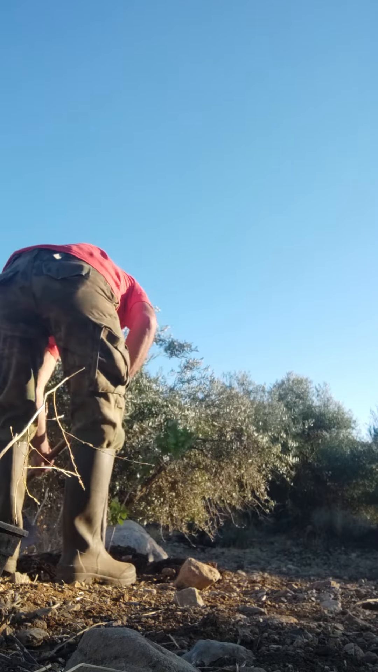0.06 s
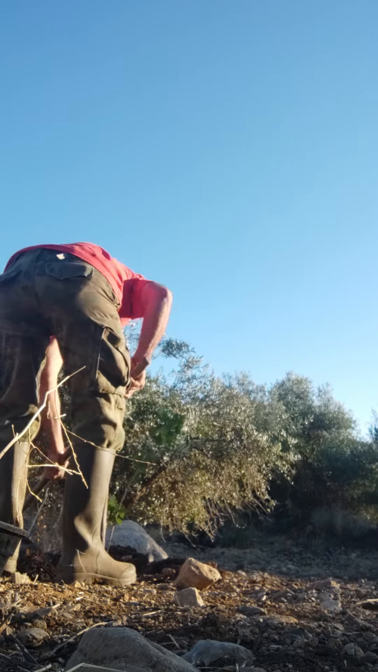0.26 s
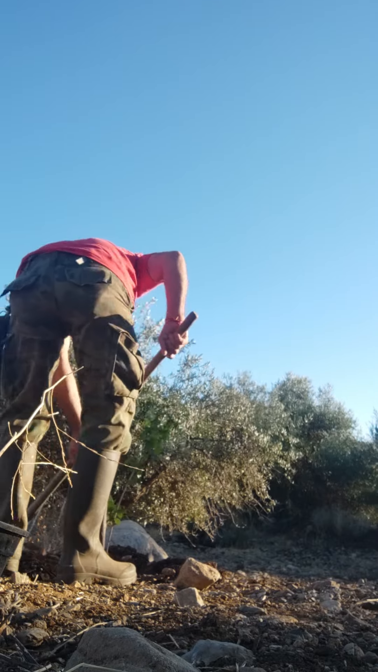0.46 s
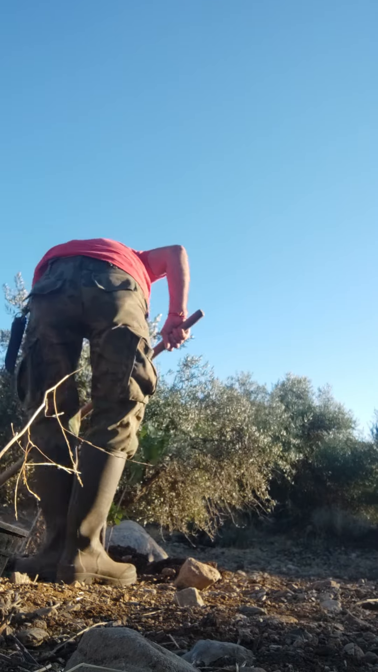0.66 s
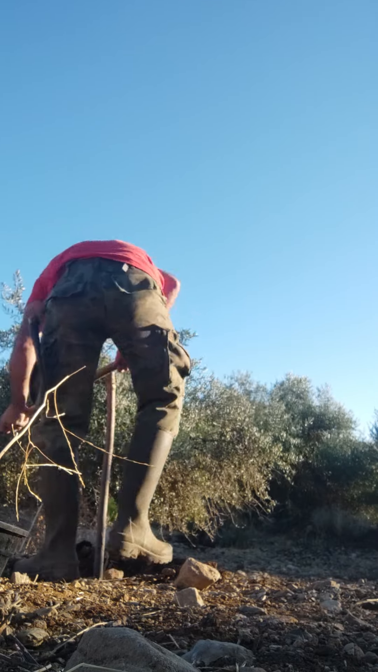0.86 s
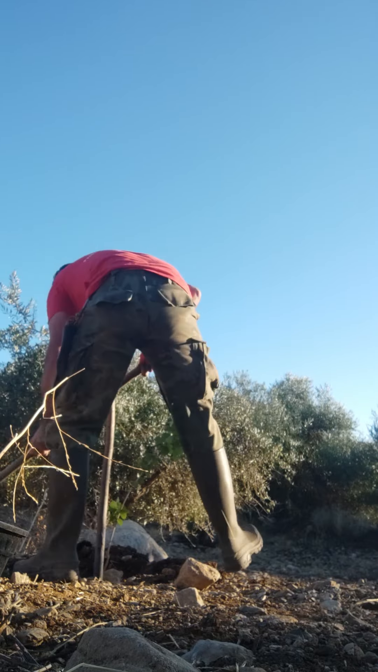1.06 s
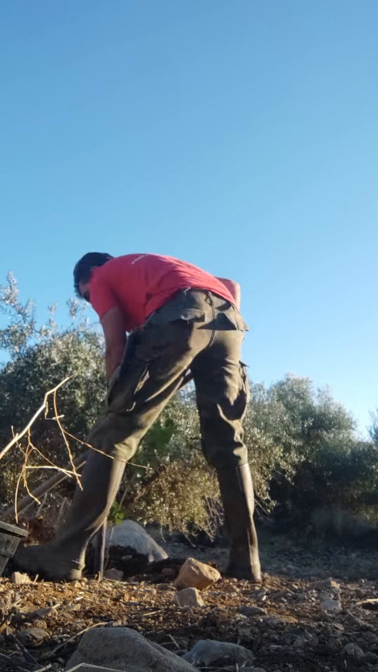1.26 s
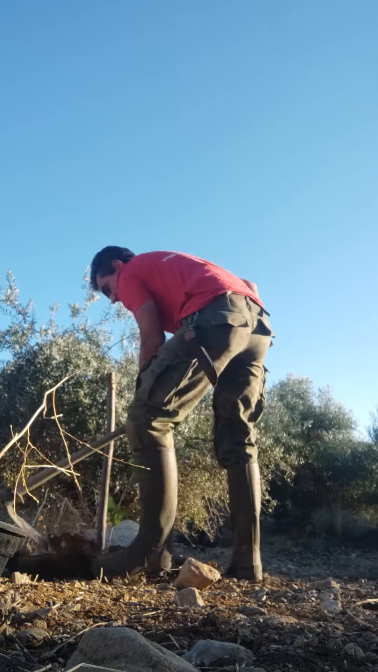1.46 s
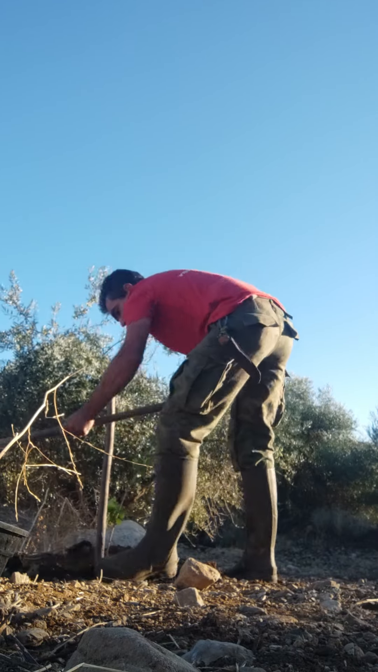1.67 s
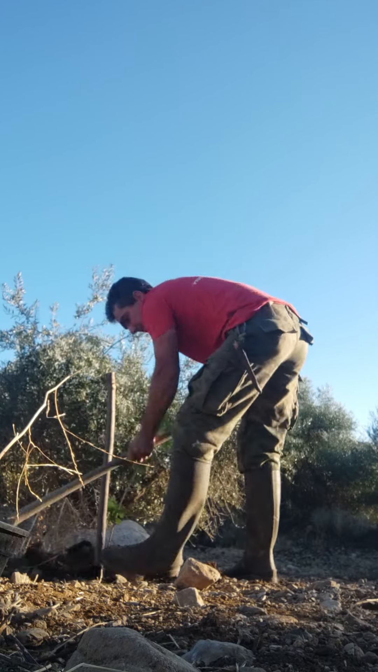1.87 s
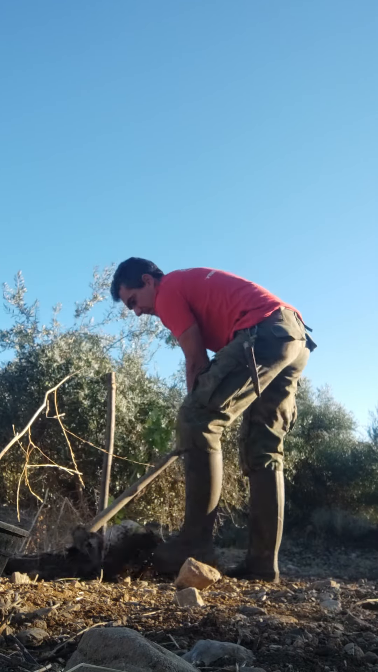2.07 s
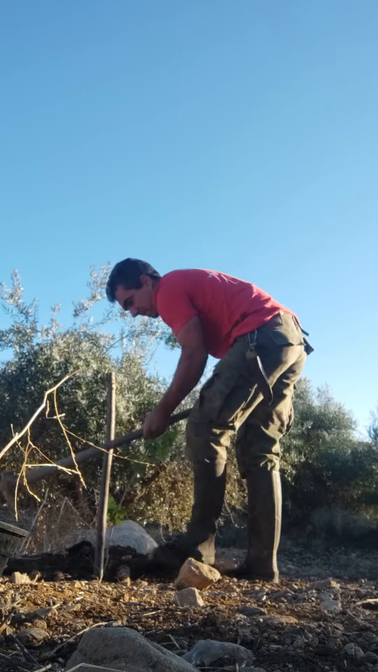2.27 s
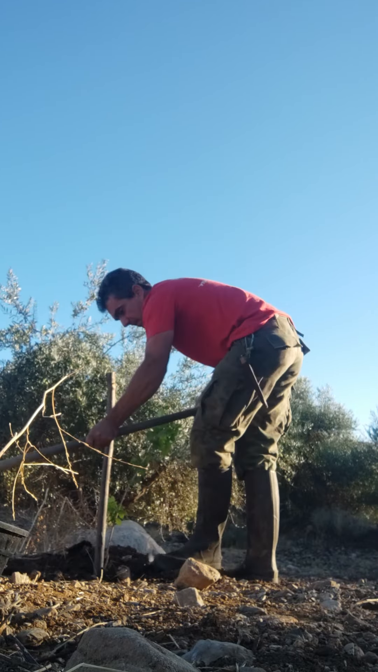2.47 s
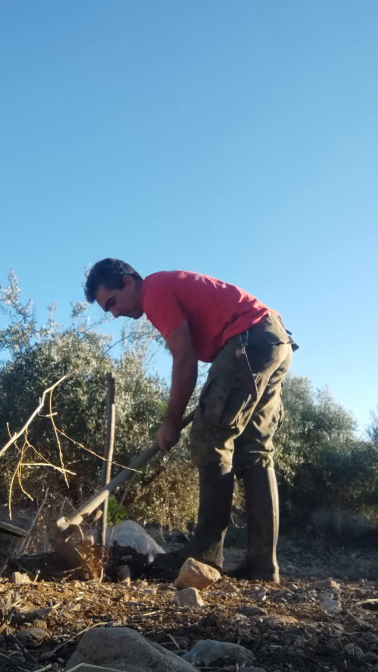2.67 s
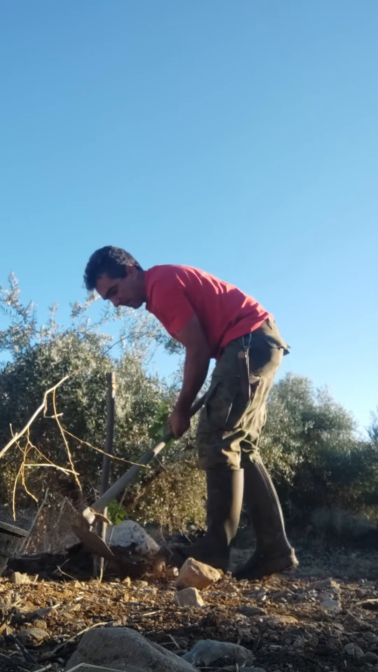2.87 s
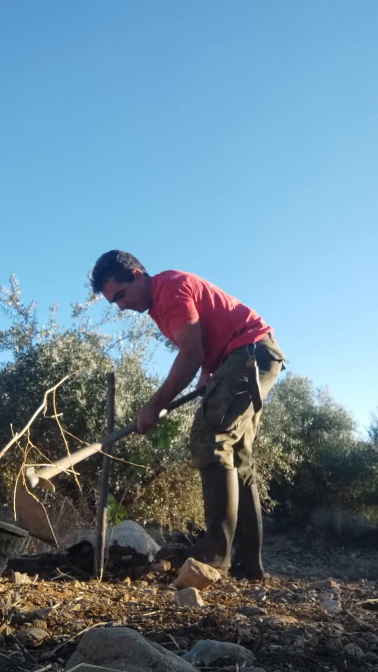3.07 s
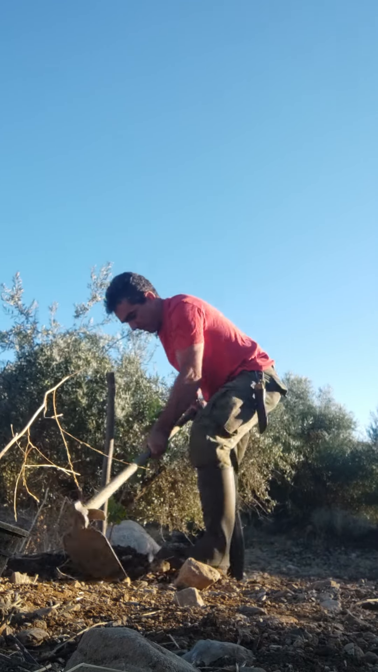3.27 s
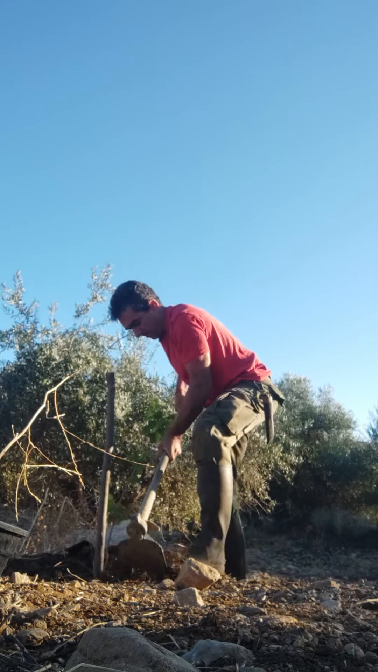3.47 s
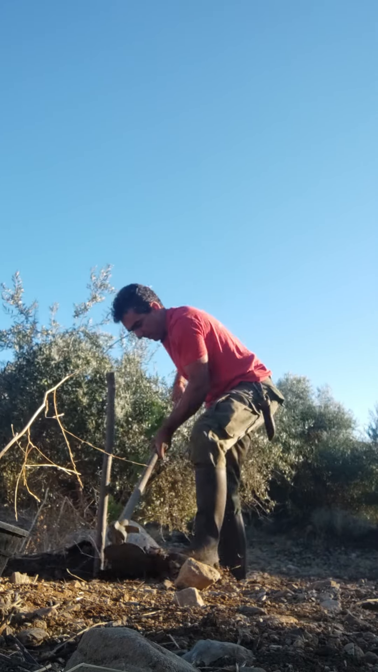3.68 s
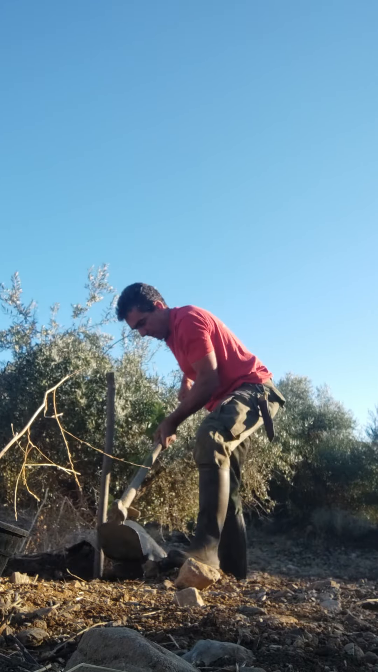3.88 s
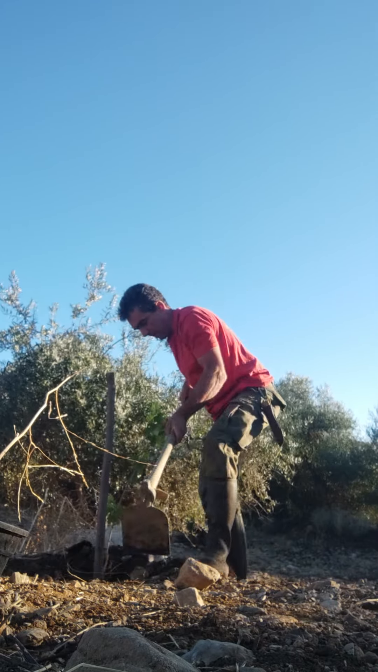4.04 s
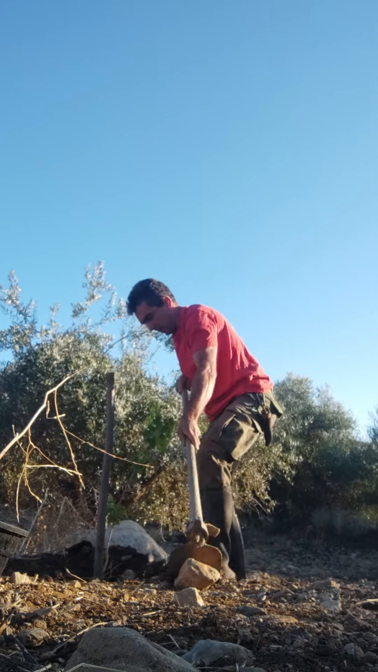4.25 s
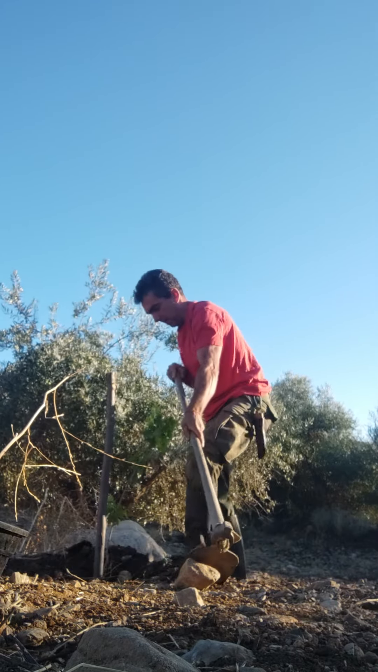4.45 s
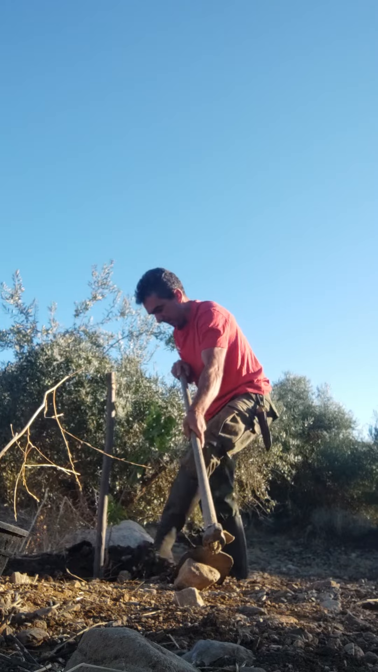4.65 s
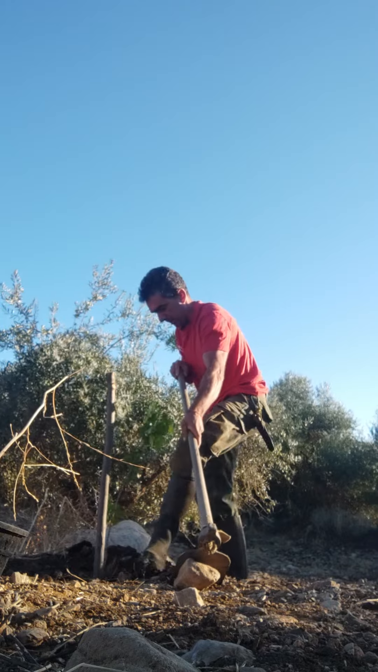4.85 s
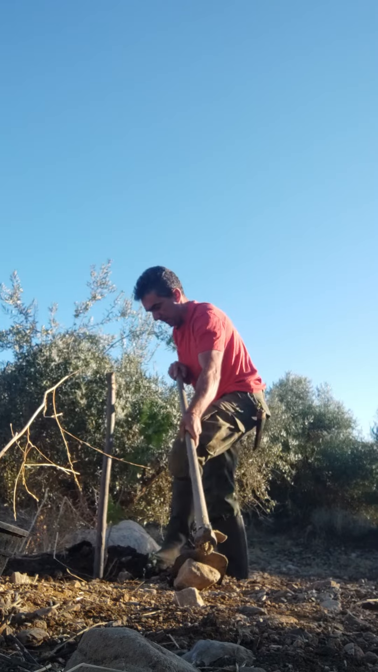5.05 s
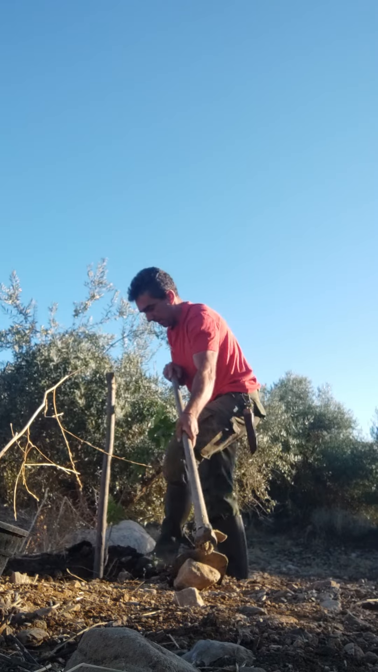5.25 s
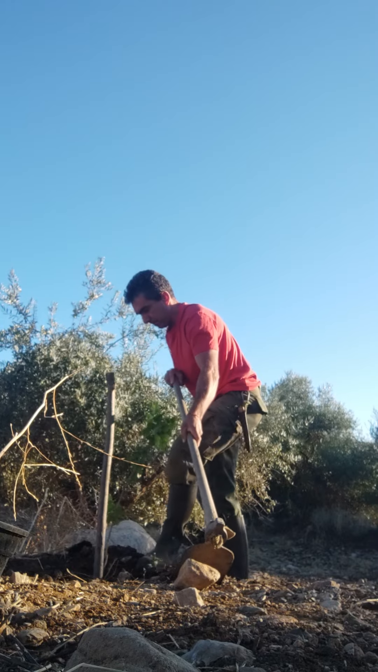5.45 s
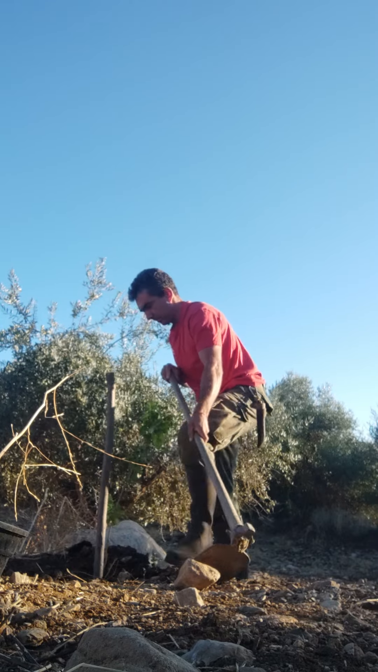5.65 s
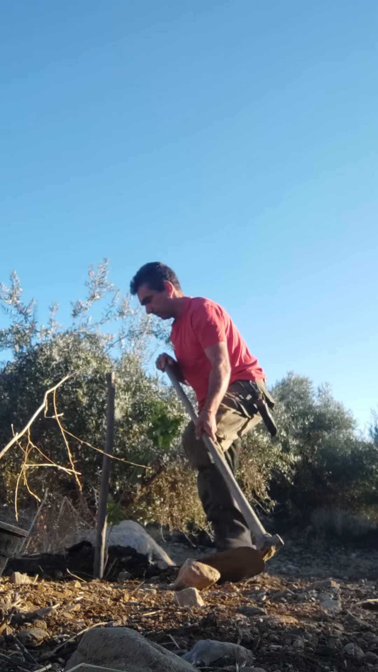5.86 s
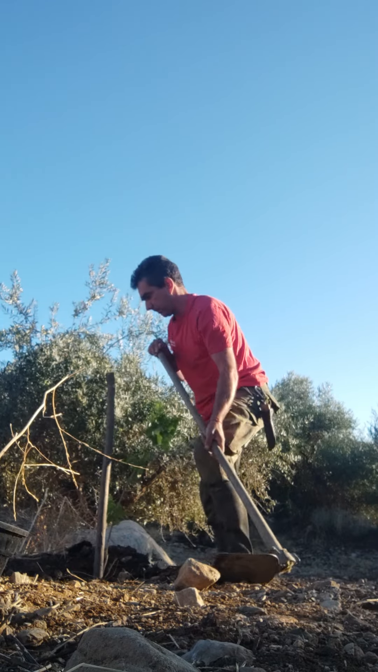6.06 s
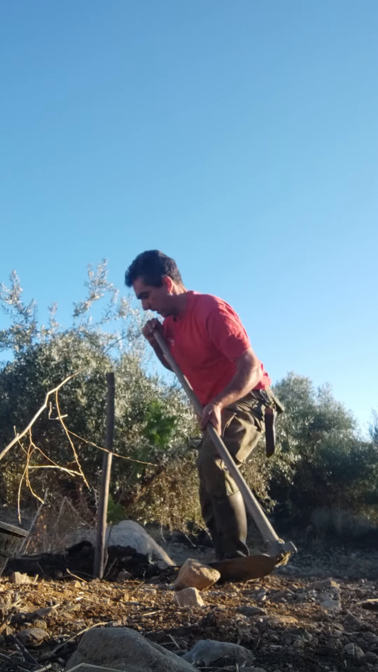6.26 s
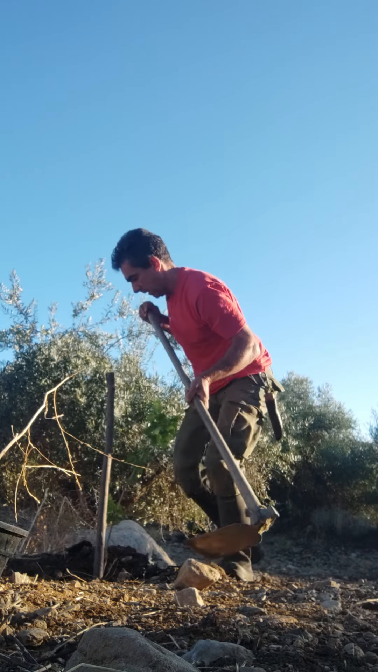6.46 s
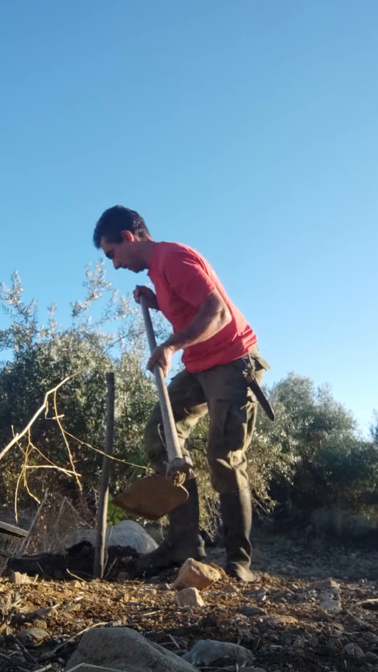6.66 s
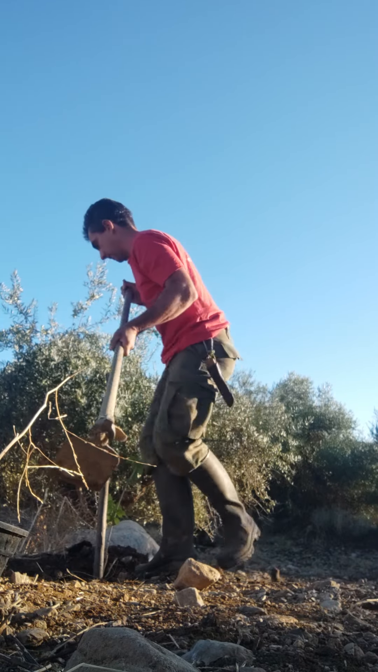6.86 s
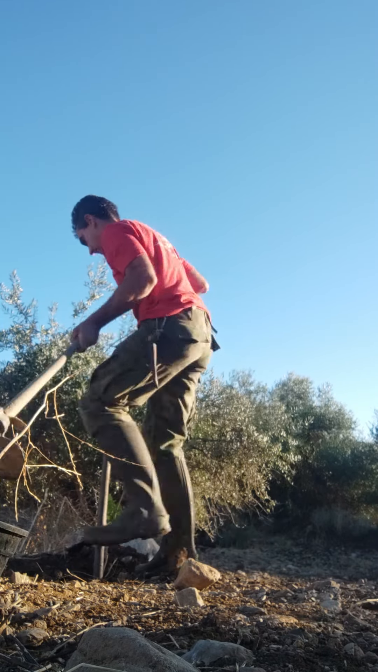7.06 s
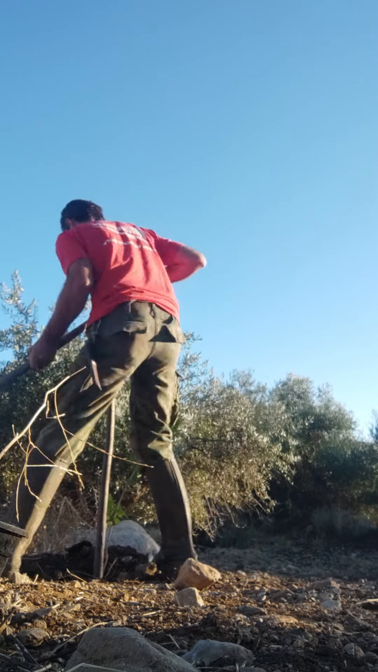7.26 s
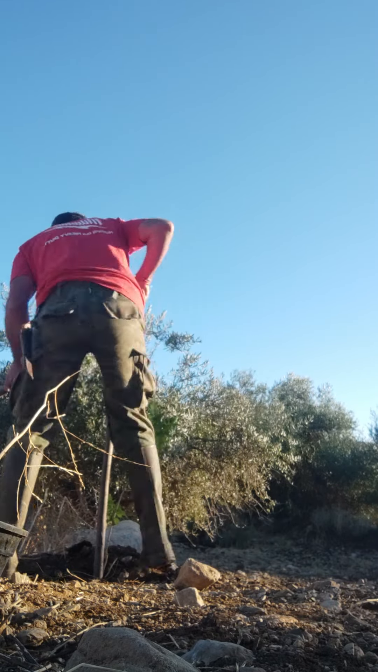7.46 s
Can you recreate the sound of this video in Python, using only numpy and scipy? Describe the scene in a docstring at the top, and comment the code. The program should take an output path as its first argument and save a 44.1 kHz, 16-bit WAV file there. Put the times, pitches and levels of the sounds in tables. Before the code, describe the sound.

Close to the ground in a quiet orchard, a hoe works dry stony soil. A small gritty scrape comes first, then a hard crunch just after one second, more chops and earth sliding, a cluster of blade clinks and gravel near three and a half seconds, then sparse dull knocks and low wind puffs. The microphone lies on the soil; left is bright and open, right muffled.

```python
"""Low rumble and a fading puff of wind, then gritty crunches close by: a broad steel hoe chops and drags
through dry stony orchard ground, a few steps from a phone lying on the soil. Each contact is noise-like grit
with a ringing stone, clod and blade; filtered clicks make the loose earth slide. Decaying sines thump through
the ground and low noise puffs on the open left port; the covered right port hears the digging dulled.
Behind it all lies a faint murmur of wind in leaves and microphone hiss, made of noise bands."""
import sys
import numpy as np
from scipy import signal
from scipy.fft import rfft, irfft
from scipy.io import wavfile

SR = 44100
rng = np.random.default_rng(int(sys.argv[2]) if len(sys.argv) > 2 else 0)


def log_audio(samples):
    """Write samples as a 16-bit WAV file to the path given in sys.argv[1]."""
    # one column per channel
    frames = np.atleast_2d(samples).T
    # limit to full scale, then quantise
    limited = np.clip(frames, -1, 1)
    pcm = np.round(limited * 32767).astype(np.int16)
    wavfile.write(sys.argv[1], SR, pcm)


N = 331632

# spectrum of crushed grit: (f/Hz, relative density level/dB)
CRUNCH_SPECTRUM = [(88, -32), (150, 2), (453, 3), (901, -3.5), (1090, -14.5), (1930, -7), (2830, -4),
                   (3110, -4), (3690, -4), (5950, -7.5), (7340, -10), (7920, -4), (8880, -20),
                   (11600, -11.5), (14300, -12.5)]
# modes of the steel blade: (f/Hz, relative level/dB, t60/s when hanging free)
BLADE_MODES = [(1845, -11, .4), (2335, -3, .3), (2786, -13, .15), (3290, -15, .15), (3736, -8, .2),
               (4097, -12, .2), (4253, -9, .2), (4705, -3, .2), (4850, -13, .15), (5460, -10, .12),
               (5636, -7, .1), (5904, -10, .1), (6212, -6, .12), (6428, -6, .13), (6900, -8, .1),
               (7542, -9, .15), (8060, -4, .2), (10650, -17, .15), (11510, -14, .15)]


def from_db(db):
    """Decibels to gain."""
    return 10 ** (np.asarray(db) / 20)


def rms_one(x):
    """Scale to unit rms."""
    return x / np.sqrt(np.mean(x ** 2) + 1e-20)


def in_time(rows):
    """Columns of a curve table, one value per sample."""
    s, *columns = np.transpose(rows)
    return [np.interp(np.arange(N) / SR, s, column) for column in columns]


def at_hz(points, hz):
    """Read a spectrum on a log-frequency axis."""
    point_hz, values = np.transpose(points)
    return np.interp(np.log(hz), np.log(point_hz), values)


def colour(x, points, sign=1):
    """Causal (minimum-phase) filter with the given dB spectrum; sign -1 inverts it."""
    size = 4096
    hz = np.maximum(np.arange(size // 2 + 1) * SR / size, 1)
    log_gain = sign * at_hz(points, hz) * np.log(10) / 20
    # folding the cepstrum onto positive times gives minimum phase
    cepstrum = irfft(log_gain)
    cepstrum[1:size // 2] *= 2
    cepstrum[size // 2 + 1:] = 0
    impulse_response = irfft(np.exp(rfft(cepstrum)))
    return signal.fftconvolve(x, impulse_response)[:N]


def band(x, low_hz, high_hz):
    """Butterworth band-pass."""
    edges_hz = [low_hz, min(high_hz, .45 * SR)]
    return signal.sosfilt(signal.butter(2, edges_hz, "band", fs=SR, output="sos"), x)


def drift(rate_hz):
    """Slow chance with unit spread: noise through two equal one-pole low-passes."""
    r = np.exp(-2 * np.pi * rate_hz / SR)
    noise = rng.standard_normal(N + SR)
    return rms_one(signal.lfilter([1], [1, -2 * r, r * r], noise)[SR:])


def grains(per_s, spread_db):
    """Random clicks of uneven size (equal if the spread is 0), either sign; rms 1."""
    sizes = from_db(spread_db * np.minimum(rng.exponential(1, N), 4)) * rng.choice([-1, 1], N)
    return rms_one(sizes * (rng.random(N) < per_s / SR))


def ring(force, hz, t60):
    """Two-pole resonance: a unit click sets a decaying sine of starting height 1 ringing."""
    r, w = from_db(-60 / (t60 * SR)), 2 * np.pi * hz / SR
    return signal.lfilter([0, np.sin(w)], [1, -2 * r * np.cos(w), r * r], force + 1e-18)


def swells(rows):
    """Each row climbs to its peak and falls away straight in dB; the loudest rules. One gain per level column."""
    t, out = np.arange(0, N, 16) / SR, -200
    for s, rise, fall, *level_db in rows:
        below = np.where(t < s, (s - t) / rise, (t - s) / fall)
        out = np.maximum(out, np.array(level_db)[:, None] - 30 * below)
    return np.array([from_db(np.interp(np.arange(N) / SR, t, v)) for v in out])


def two_ports(mid, side, alike):
    """Two equally strong noises become left and right with the given correlation."""
    return np.sqrt(1 + alike) * mid + np.sqrt(1 - alike) * side * [[1], [-1]]


def air():
    """Distant murmur of wind in leaves and microphone hiss: half-octave noise bands of wandering level."""
    # spectrum of the murmur: (f/Hz, relative density level/dB)
    spectrum = [(15, -33.5), (25, -10.5), (87, -2.5), (179, -1.5), (503, -8.5), (770, -16.5), (1380, -19),
                (3060, -24.5), (4440, -30), (4940, -26), (7170, -43), (7970, -39), (8860, -42.5),
                (13200, -28), (14300, -27.5)]
    # (f/Hz, left minus right level/dB)
    balance = [(60, -5), (110, -7), (200, 4), (370, -4), (690, 4.5), (1270, 2), (2330, 6.5), (4290, 5),
               (7900, 1.5), (14500, 11)]
    # (f/Hz, left-right correlation [-1 to 1])
    likeness = [(60, 0.56), (130, 1), (290, 0.6), (630, 0.28), (1380, -0.02), (3030, -0.057),
                (6630, -0.095), (14500, 0.75)]
    # unsteadiness: (f/Hz, spread of level/dB)
    unsteadiness = [(100, 3), (700, 3), (3000, 1.5), (9000, .7)]
    murmur_db = -59.5
    out, edges = 0, 22 * 2 ** np.arange(0, 9.6, .5)
    white = rng.standard_normal((2, 2, N))
    flicker = [drift(10), drift(8), drift(4.7)]   # dealt to the bands in turn
    for k, (low, high) in enumerate(zip(edges, edges[1:])):
        mid, side = band(white[k % 2], low, high)
        hz = np.sqrt(low * high)
        lean = at_hz(balance, hz) / 2
        gain = from_db(at_hz(unsteadiness, hz) * flicker[k % 3] + [[lean], [-lean]])
        out = out + gain * two_ports(mid, side, at_hz(likeness, hz))
    return from_db(murmur_db) * rms_one(np.array([colour(port, spectrum) for port in out]))


def ground_rumble():
    """Ground rumble under the blows and steps: swelling low noise, nearly alike at both ports."""
    # (peak t/s, rise/s, fall/s, relative level/dB); rise and fall span 30 dB
    rumbles = [(0, .1, 0.3, -42.5), (.4, .4, 0.56, -46), (.67, 0.057, 0.13, -41.5), (.9, 0.24, 0.42, -48),
               (1.13, 0.11, .12, -38.5), (1.45, 0.54, 0.32, -36), (1.7, 0.99, .3, -45.5),
               (1.9, .2, 0.22, -40.5), (2.08, 0.27, .25, -42), (2.32, 0.12, 0.16, -43),
               (2.47, 0.025, 0.13, -44.5), (2.57, 0.04, 0.2, -33.5), (2.7, .2, .08, -39.5),
               (2.81, 0.2, 0.048, -39.5), (2.89, 0.095, 0.15, -43.5), (3.2, 0.19, 0.2, -41.5),
               (3.52, .2, .25, -40.5), (4.25, 0.12, 0.76, -46.5), (4.71, .15, 0.35, -47.5),
               (5.12, 0.53, 0.13, -51), (5.28, 0.036, 0.16, -42.5), (5.61, 0.34, 0.29, -48.5),
               (5.97, 0.045, .17, -47), (6.7, 0.019, 0.033, -31.5), (6.85, .3, .07, -42),
               (7.06, .15, 0.1, -49), (7.33, .4, .6, -48)]
    calm_db, trim_db, alike = -59, -9.5, .98
    level = swells(rumbles)[0] + from_db(calm_db)
    mid, side = band(rng.standard_normal((2, N)), 66, 190) * from_db(.78 * drift(3.3))
    return level * from_db(trim_db) * rms_one(two_ports(mid, side, alike))


def wind_puffs():
    """Wind buffets the open port: very low noise of restless level."""
    # (peak t/s, rise/s, fall/s, relative level/dB); rise and fall span 30 dB
    gusts = [(0, .1, 0.082, -44), (.12, .07, 0.11, -55), (.67, 0.4, 0.23, -46), (2.7, 0.11, 0.062, -48),
             (3.52, 0.063, .15, -55), (3.98, 0.27, .25, -55.5), (5.82, 0.064, 0.047, -39.5),
             (6.12, 0.063, .12, -38), (6.38, .1, 0.19, -53.5), (6.55, 0.067, .12, -49.5),
             (6.71, .08, 0.23, -45), (6.81, .15, 0.048, -31.5), (7.18, 0.11, 0.11, -44.5)]
    calm_db, trim_db = -67, 3
    level = swells(gusts)[0] + from_db(calm_db)
    buffeting = band(rng.standard_normal(N), 22, 85) * from_db(4 * drift(12))
    return level * from_db(trim_db) * rms_one(buffeting)


def thumps():
    """Thumps through the ground and gust slaps: decaying sines, each leaning to one port."""
    # (t/s, level/dB before the lean, f/Hz, t60/s, left minus right level/dB)
    pushes = [(0.352, -38, 116, 0.14, 0), (0.558, -30.5, 86, 0.069, 32), (0.967, -50, 180, 0.2, 2),
              (1.119, -35.5, 93, 0.26, -3), (1.207, -34, 117, 0.22, -5.5), (1.278, -47, 119, 0.48, -25),
              (1.835, -31.5, 110, 0.2, -5), (2.045, -41, 125, 0.4, -8), (2.569, -39, 96.9, 0.16, -4.0),
              (2.677, -38, 90.5, 0.11, -8), (2.774, -50, 183, 0.059, -7), (3.337, -41.5, 147, 0.17, -3),
              (3.482, -40, 183, 0.064, 1.0), (4.679, -41, 184.6, 0.14, -2), (4.879, -39.5, 80, 0.038, -1),
              (5.266, -37, 206, 0.073, -2), (5.797, -32.5, 58.7, 0.13, 17.5), (5.955, -55, 159, 0.18, -0.5),
              (6.095, -29.5, 67.5, 0.085, 28), (6.523, -43.5, 96, 0.14, 6),
              (6.681, -30.5, 104.4, 0.14, 30.5), (7.164, -49.5, 48.4, 0.08, 14)]
    out = np.zeros((2, N))
    for s, peak_db, hz, t60, pan_db in pushes:
        start = int(s * SR)
        t = np.arange(min(SR // 4, N - start)) / SR
        onset = np.minimum(t * hz * 2, 1)   # half a cycle
        push = from_db(peak_db - 60 * t / t60) * np.sin(2 * np.pi * hz * t) * onset
        lean = np.tanh(pan_db * np.log(10) / 40)
        out[:, start:start + len(t)] += push * [[1 + lean], [1 - lean]]
    return out


def soil():
    """Crumbs knock softly while earth slides; fine grit patters in clumps: coloured clicks."""
    # loose soil on the move: (t/s, sliding earth level/dB, fine grit relative level/dB)
    motion = [(0, -64, -67.5), (.3, -61.5, -64.5), (.95, -72.5, -73), (1.15, -58.5, -67),
              (1.35, -54.5, -62), (1.75, -63, -66.5), (2.02, -52.5, -62), (2.36, -62, -70),
              (2.74, -73, -67), (2.9, -62.5, -65), (3.3, -65.5, -71.5), (3.52, -51.5, -51.5),
              (3.8, -59, -56), (4.05, -56, -67), (4.55, -61, -68), (5.4, -68, -71.5), (6.2, -60.5, -70),
              (6.9, -66.5, -73.5), (7.52, -68, -71)]
    # spectrum of sliding earth: (f/Hz, relative density level/dB)
    earth_spectrum = [(120, -24.5), (250, 0), (450, 3), (800, -8.5), (1300, -9.5), (2500, -28),
                      (15000, -50.5)]
    earth_db, grit_db = in_time(motion)
    earth = colour(grains(1500, spread_db=2), earth_spectrum) * from_db(3.5 * drift(25))
    grit = band(colour(grains(7000, spread_db=3), CRUNCH_SPECTRUM), 1600, 16000) * from_db(2.5 * drift(40))
    return from_db(earth_db) * rms_one(earth) + from_db(grit_db - 2.5) * rms_one(grit)


def free_blade():
    """Knocks on the lifted blade set all modes ringing, with strengths that vary at random as if by place."""
    # (t/s, relative level/dB, tilt/dB per octave about 4 kHz)
    knocks = [(.18, -68, 5), (2.691, -47, 7), (2.792, -54, 6.5), (2.83, -66, -4), (2.859, -55.5, -3),
              (2.885, -72, 18), (3.41, -39.5, 2), (3.63, -61, -2), (3.699, -58, 4), (3.732, -59, 2),
              (3.8, -43, 2.5), (3.82, -41, 3), (3.875, -51.5, -12), (5.512, -57, -6)]
    s, knock_db, tilt_db = np.transpose(knocks)
    at, out = np.round(s * SR).astype(int), np.zeros(N)
    where_db = rng.normal(0, 2.5, (len(at), len(BLADE_MODES)))
    for k, (hz, level_db, t60) in enumerate(BLADE_MODES):
        clicks = np.zeros(N)
        clicks[at] = from_db(knock_db + level_db + tilt_db * np.log2(hz / 4000) + where_db[:, k])
        out += ring(clicks, hz, t60)
    return out


def buried_blade(jolt):
    """The blade's modes driven by the digging, all damped short by soil; each mode's strength wanders."""
    t60_s, ring_db = .045, -25.5
    tilt_db = 1.5   # per octave: soil stills the low modes most
    out = np.zeros(N)
    for hz, level_db, _ in BLADE_MODES:
        mode_db = ring_db + level_db + tilt_db * np.log2(hz / 4000) + 4 * drift(25)
        out += ring(jolt * from_db(mode_db), hz, t60_s)
    return out


def drags():
    """Clicks dealt to short resonances of clods and gravel, over finer sand; also returns the blade's jolts."""
    # bursts of scraping: (peak t/s, rise/s, fall/s, then relative level/dB of gravel, sand, crumbling clods);
    # rise and fall span 30 dB
    scrapes = [(.29, 0.013, 0.041, -42.5, -40.5, -39), (.364, 0.14, 0.096, -42.5, -64, -37.5),
               (.7, 0.17, 0.49, -67, -83, -48.5), (1.102, 0.0044, 0.062, -27, -24, -48),
               (1.128, 0.025, 0.097, -35.5, -32.5, -40), (1.19, 0.09, .05, -38.5, -60, -35.5),
               (1.38, .05, .2, -65, -61, -45), (1.476, .12, 0.11, -58, -55, -37),
               (1.834, 0.0074, 0.033, -30.5, -17.5, -27.5), (1.9, 0.042, 0.074, -35.5, -31, -45),
               (2.032, 0.062, 0.14, -57, -57, -47), (2.566, 0.0071, 0.12, -27.5, -21, -35.5),
               (2.68, 0.032, .08, -33.5, -34, -43), (2.786, 0.026, 0.047, -38, -40.5, -35),
               (2.82, 0.018, 0.24, -56, -54, -49.5), (3.349, 0.0095, 0.049, -26.5, -24, -32),
               (3.37, .03, 0.048, -50, -45, -28), (3.39, 0.04, 0.23, -39.5, -38, -40),
               (3.485, 0.034, 0.062, -43, -26.5, -36), (3.524, 0.026, 0.028, -29, -45, -36),
               (3.56, .02, 0.17, -50.5, -45.5, -49.5), (3.808, 0.031, 0.048, -43.5, -37, -40),
               (3.87, 0.042, 0.12, -74, -58, -59), (4.269, .003, 0.075, -44, -27.5, -35),
               (4.407, 0.053, 0.057, -58.5, -69, -60), (4.505, 0.013, 0.16, -58, -70.5, -51),
               (4.91, .1, 0.14, -61, -83, -54.5), (5.52, .1, 0.15, -53, -61, -60),
               (6.04, 0.019, .12, -55.5, -63, -46), (6.068, 0.066, 0.055, -47, -60, -50),
               (6.148, .02, 0.018, -64, -53, -61), (6.25, 0.37, .1, -66.5, -69, -52.5),
               (6.734, 0.091, .12, -79, -78, -56), (6.846, 0.021, .02, -65, -67, -40.5),
               (7.42, .04, 0.12, -63, -79, -59)]
    gravel_tilt_db = 2   # per octave: small pebbles sound louder than big ones
    gravel_level, sand_level, clod_level = swells(scrapes)
    clumps = from_db(2 * drift(150))
    clicks = rms_one(grains(4000, spread_db=3.8) * clumps)
    dealt = rng.integers(0, 32, N)   # which of 32 pieces each click strikes
    pieces = []
    for k, hz in enumerate(np.geomspace(260, 5800, 32)):
        piece = ring(clicks * (dealt == k), hz, 20 / hz)
        pieces.append(piece * from_db(gravel_tilt_db * np.log2(hz / 900)))
    clods, gravel = rms_one(sum(pieces[:13])), rms_one(sum(pieces[13:]))
    sand = rms_one(band(colour(grains(9000, spread_db=4), CRUNCH_SPECTRUM), 5000, 22000) * clumps)
    mix = gravel_level * gravel + sand_level * sand + from_db(-4.5) * clod_level * clods
    return from_db(1) * mix, gravel_level * clicks


def contacts():
    """Each strike cracks, crushes grit, rings a stone and a clod, and jolts the blade (returned second)."""
    # blade or boot on stone: (t/s, reference level/dB, clod knock level/dB rel, grit fizz level/dB rel,
    # crunch t60/s, stone f/Hz, stone level/dB rel, clod f/Hz)
    strikes = [(0.171, -50.5, 5.5, 6.5, 0.047, 2360, -9, 273),
               (.287, -32.5, 10.5, -7, 0.027, 1270, 8.5, 354), (.327, -45.5, 11, -9, 0.033, 1260, -7, 313),
               (.343, -26.5, -3, -12, 0.0094, 1240, 3.5, 548), (.36, -20.5, -4, -9, 0.015, 1596, 0.5, 710),
               (.414, -48, 11, -21, 0.022, 1650, 6, 562), (.424, -43, -13, -21, 0.023, 1580, 5.5, 363),
               (0.446, -50, -24, -17, 0.049, 2110, 8, 269), (1.099, -11, -25.5, -20, 0.04, 3280, -11, 770),
               (1.123, -17.5, -17, 1, 0.028, 3200, -2.5, 595), (1.157, -30.5, -1, -7, 0.039, 784, 4, 710),
               (1.185, -29.5, -10, -7, 0.023, 2360, -3, 337), (1.208, -40.5, 11, -4, 0.028, 840, 3, 352),
               (1.358, -51.5, 8, 7.5, 0.089, 1180, -16.5, 318), (1.396, -47.5, 10, 5, .045, 920, -2, 268),
               (1.441, -52, -2, 9, 0.13, 895, -9, 358), (1.571, -48, 9.5, 1, .045, 751, -20, 604),
               (1.829, -17, -16, -35, 0.067, 4500, -10.5, 320),
               (1.877, -41, -25, 13.5, 0.042, 2100, 3, 221), (1.898, -34, 2.5, -16, 0.17, 3780, -3, 251),
               (1.96, -43.5, -7, -15, 0.034, 1270, -11, 221), (1.988, -44, -1, -18, .03, 2790, -3, 221),
               (2.001, -41, -20, -22, 0.025, 1550, -16, 355), (2.025, -42, -10, 3, 0.043, 2240, -1, 221),
               (2.052, -46.5, 8, -30, 0.053, 930, 4, 234), (2.563, -21.5, -5, 7.5, 0.072, 1330, -29, 570),
               (2.579, -16.5, -32, -5, 0.018, 720, -10.5, 748), (2.64, -25, -4.5, 3, .076, 2250, -7, 600),
               (2.681, -18.5, -27, -27, 0.031, 740, -6.5, 740), (2.771, -42, 8, -16, 0.027, 885, 5, 376),
               (2.783, -23.5, -3.5, -7, 0.022, 1394, -3.5, 566),
               (2.878, -47.5, 7.5, 5, .04, 2240, -19, 253), (3.003, -50, 7, -9, 0.014, 1240, 5, 220),
               (3.038, -42, -23, -30, 0.018, 1280, -11, 234),
               (3.344, -21.5, -12, 16.5, 0.075, 3830, 0, 754),
               (3.359, -15.5, -13, 5.5, 0.032, 3746, 0, 330),
               (3.398, -33.5, -21, 13.5, .045, 1110, -9, 342), (3.41, -30, -27, 16.5, 0.036, 786, -14, 328),
               (3.472, -20, -5.5, -35, 0.051, 1790, -18, 630), (3.493, -25, -12, -10, .04, 794, -7, 764),
               (3.519, -16.5, -38, -5, 0.035, 903, 0, 654), (3.629, -32, -16, -30, 0.032, 1810, -20, 660),
               (3.726, -47, -11, -13, .046, 2280, -21, 221), (3.783, -50, -14, -1, .029, 3360, 0, 345),
               (3.794, -38, -6, 3, 0.047, 3950, 5.5, 736), (3.806, -26, -1.5, -19, 0.046, 790, -4, 503),
               (3.82, -38, 5.5, -11, 0.021, 3850, 8.5, 503), (4.267, -20, -34, -29, 0.079, 2790, 1, 734),
               (4.501, -43.5, 2, -21, 0.021, 1010, -9, 362), (4.517, -41.5, -21, -18, 0.019, 873, 5.5, 700),
               (4.754, -39, -11, -15, 0.018, 3970, -10, 223),
               (4.878, -45.5, -27, -14, 0.016, 836, 3.5, 242),
               (5.441, -55.5, -13, -11, 0.035, 958, 5.5, 342),
               (5.471, -47.5, -12, -15, 0.069, 775, -13, 347),
               (5.493, -38.5, -19, -24, 0.042, 4040, -7, 627),
               (5.509, -38, -32, -28, 0.074, 1870, -6.5, 651), (6.03, -50, 8, -4, 0.07, 930, 4, 400),
               (6.045, -40.5, -18, 1, 0.045, 1500, -1, 580), (6.063, -40, -1, 5, 0.051, 1495, -3, 618),
               (6.143, -36.5, -11, -12, 0.029, 2410, -7, 342), (6.843, -44, 6.5, -1, 0.014, 1010, -5, 316)]
    # dull knocks of falling clods and boot soles: (t/s, reference level/dB, clod f/Hz)
    dull_knocks = [(.689, -38, 395), (.755, -39, 353), (1.469, -29, 363), (1.499, -37, 613),
                   (2.304, -36.5, 593), (2.954, -34.5, 538), (2.984, -34, 500), (3.164, -36.5, 405),
                   (3.699, -39.5, 240), (4.402, -46, 283), (4.678, -36.5, 221), (4.786, -40, 221),
                   (5.279, -36, 221), (5.964, -34, 388), (6.188, -46, 496), (6.213, -44, 638),
                   (6.721, -33, 370), (6.752, -32, 226), (7.05, -39.5, 218), (7.325, -40.5, 244),
                   (7.425, -31, 347)]
    crack_db, rise_s, clod_t60_s = 6, .001, .05
    stone_t60_s, stone_follows = .013, .86   # a stone rings longer where the crunch lasts longer
    thud_gravel_db, thud_t60_s = -28.5, .052   # a thud is nearly all clod
    grit = grains(12000, spread_db=0)
    crunch = colour(grit, CRUNCH_SPECTRUM)
    clods, gravel, sand = [rms_one(band(crunch, low, high))
                           for low, high in [(220, 760), (800, 4050), (5000, 17000)]]
    out, jolt, t = np.zeros(N + SR), np.zeros(N + SR), np.arange(SR // 5) / SR
    click = 1. * (t == 0)
    mid_crack, high_crack = band(click, 800, 5000), band(click, 5000, 17000)
    onset = np.minimum(t / rise_s, 1)
    thuds = [(s, db + thud_gravel_db, -thud_gravel_db, -15, thud_t60_s, 820, -8, hz)
             for s, db, hz in dull_knocks]
    for s, peak_db, knock_db, fizz_db, t60, stone_hz, stone_db, clod_hz in strikes + thuds:
        span = slice(int(s * SR), int(s * SR) + len(t))
        clod_part, gravel_part, sand_part, grit_part = [np.resize(v[span], len(t))
                                                        for v in (clods, gravel, sand, grit)]
        swell, dying_db = onset * from_db(peak_db - 6.5), -60 * t / t60
        crushed = gravel_part * from_db(dying_db)
        crushed += clod_part * from_db(knock_db - 6.5 + .54 * dying_db)   # clods die slower
        crushed += sand_part * from_db(fizz_db + dying_db)
        out[span] += swell * crushed
        out[span] += from_db(peak_db + crack_db) * (mid_crack + from_db(fizz_db) * high_crack)
        stone_click = click * from_db(peak_db + stone_db)
        out[span] += onset * ring(stone_click, stone_hz, stone_t60_s + stone_follows * t60)
        clod_click = click * from_db(peak_db + knock_db - 2.5)
        out[span] += onset * ring(clod_click, clod_hz, clod_t60_s)
        jolt[span] += swell * grit_part * from_db(dying_db)
    return out[:N], jolt[:N]


def scene():
    """Digging reaches the open port directly, the covered port dulled and with scattered treble, over the lows."""
    # loss at the covered port: (f/Hz, loss level/dB)
    cover_loss = [(60, 38), (110, -6), (200, -0.5), (370, 3), (690, 3.5), (1270, 7.5), (2330, 14.5),
                  (4290, 23), (7900, 44.5), (14500, 26)]
    scatter_db, scatter_t60_s, scrape_jolt_db = 5, .02, -7
    (crunch, blow), (scrape, rub) = contacts(), drags()
    blade = buried_blade(blow + from_db(scrape_jolt_db) * rub) + free_blade()
    digging = crunch + scrape + blade + soil()
    # treble scattered by the stones around: a short decaying noise echo of wandering gain
    t = np.arange(SR // 20) / SR
    scatter = band(rng.standard_normal(len(t)) * from_db(-60 * t / scatter_t60_s), 1700, 21000)
    scatter /= np.linalg.norm(scatter)
    scattered = signal.fftconvolve(digging, scatter)[:N] * from_db(scatter_db) * drift(60)
    covered = colour(digging + scattered, cover_loss, sign=-1)
    opened = np.roll(digging, shift=2)   # two samples later
    ports = np.array([opened, covered]) + ground_rumble() + thumps() + air()
    ports[0] += wind_puffs()
    return ports


def record(dry):
    """The ports' response falls away above their last resonance, then the top is cut steeply."""
    port_edge_hz, cutoff_hz = 14650, 17000   # stop-band edges
    ports = signal.sosfilt(signal.cheby2(8, 28, port_edge_hz, fs=SR, output="sos"), dry)
    return signal.sosfilt(signal.cheby2(10, 60, cutoff_hz, fs=SR, output="sos"), ports)


dry = scene()
out = record(dry)
log_audio(out)
```